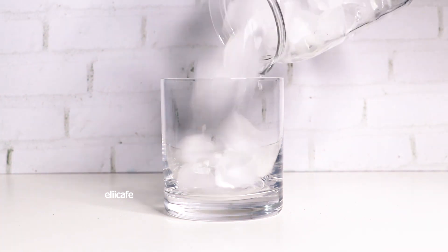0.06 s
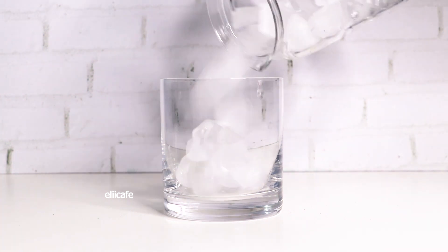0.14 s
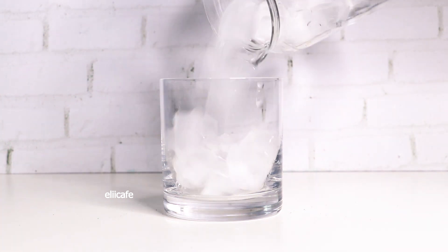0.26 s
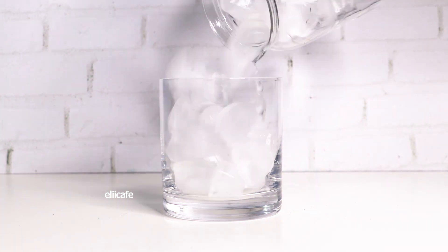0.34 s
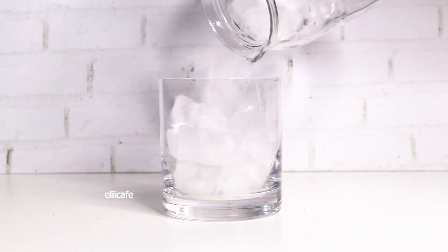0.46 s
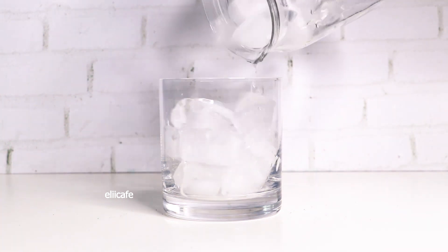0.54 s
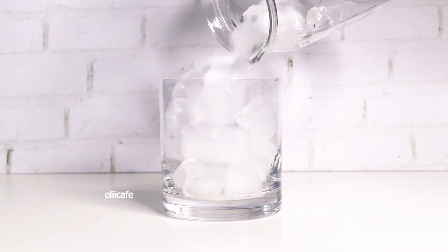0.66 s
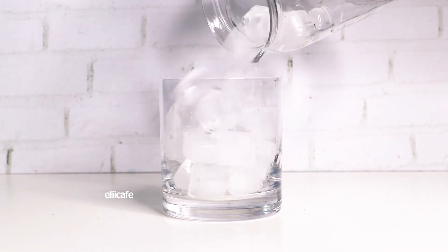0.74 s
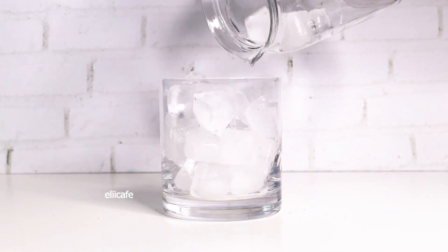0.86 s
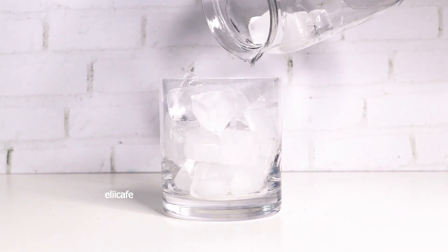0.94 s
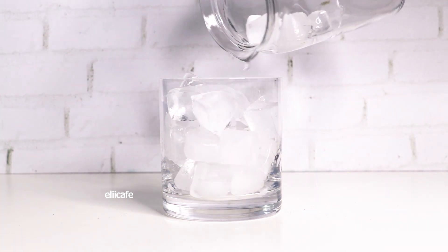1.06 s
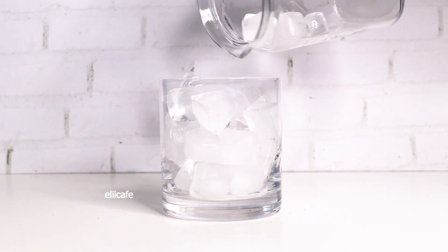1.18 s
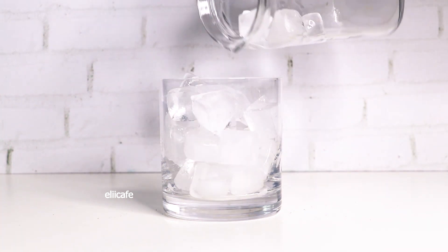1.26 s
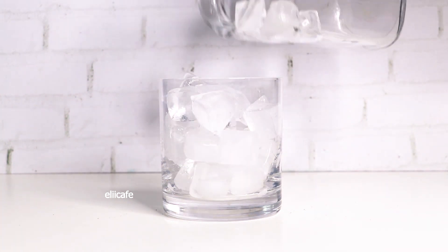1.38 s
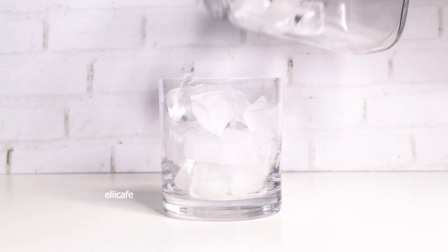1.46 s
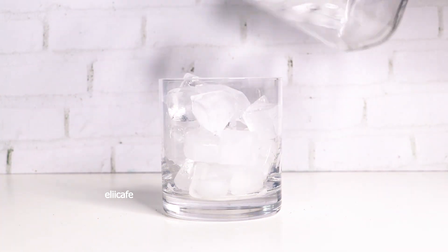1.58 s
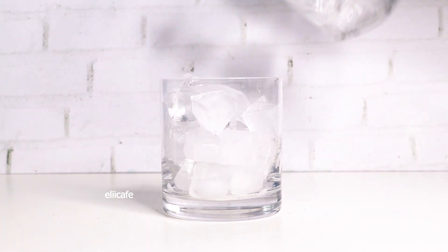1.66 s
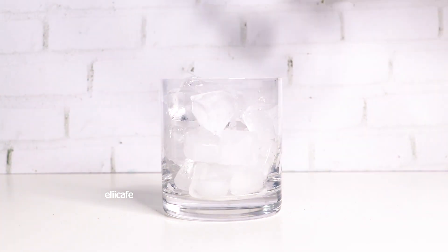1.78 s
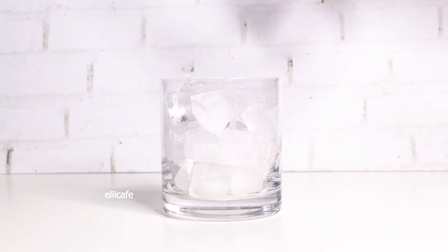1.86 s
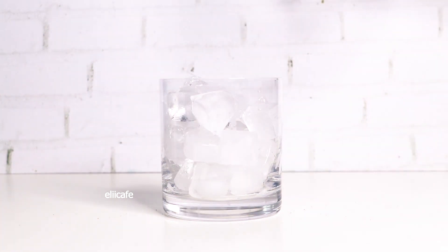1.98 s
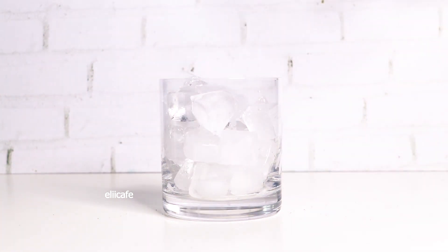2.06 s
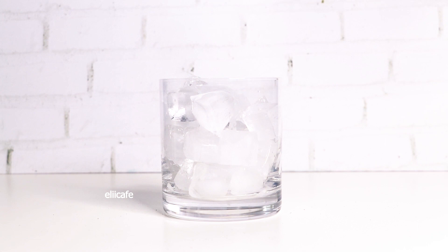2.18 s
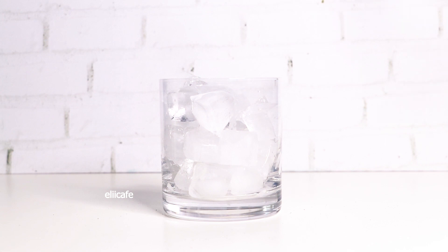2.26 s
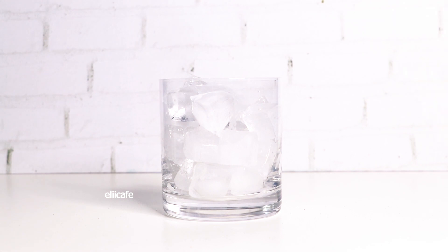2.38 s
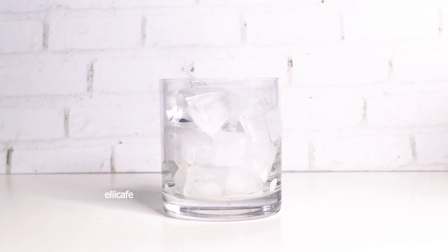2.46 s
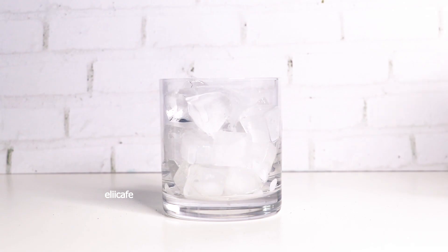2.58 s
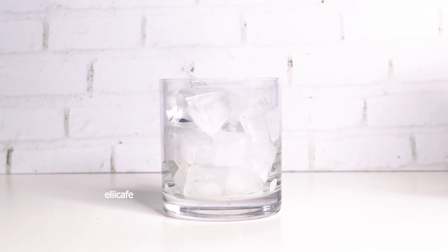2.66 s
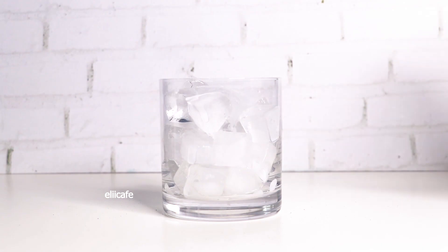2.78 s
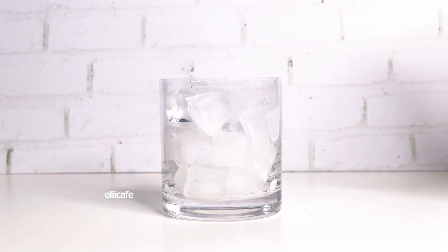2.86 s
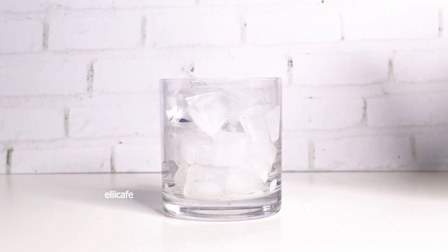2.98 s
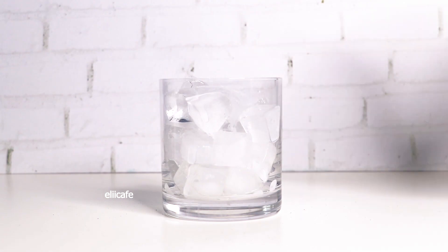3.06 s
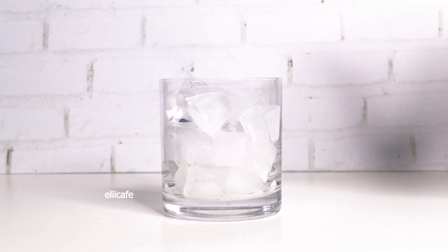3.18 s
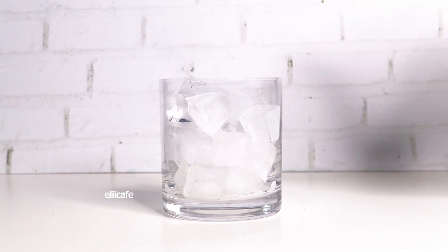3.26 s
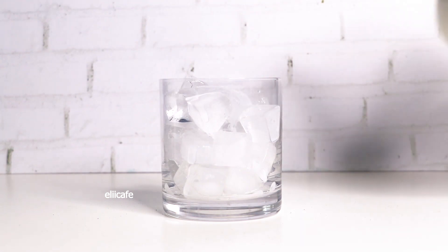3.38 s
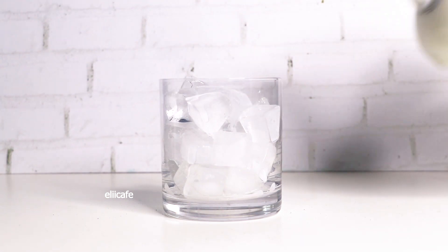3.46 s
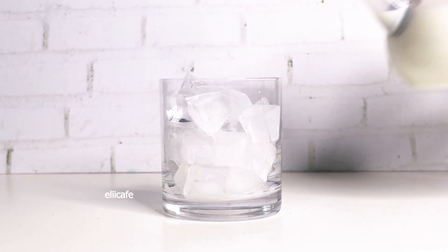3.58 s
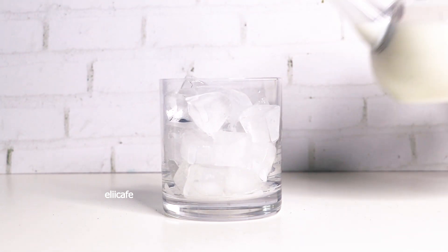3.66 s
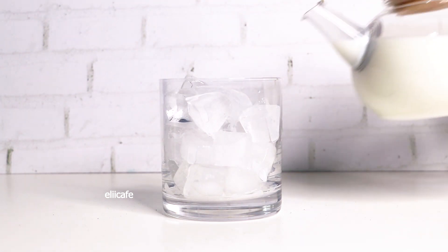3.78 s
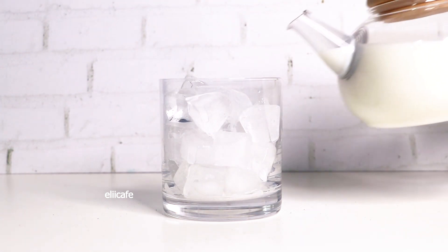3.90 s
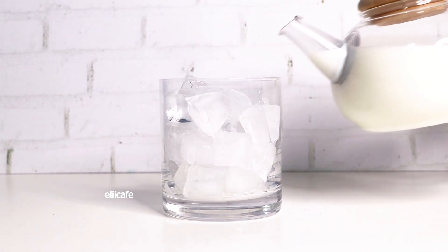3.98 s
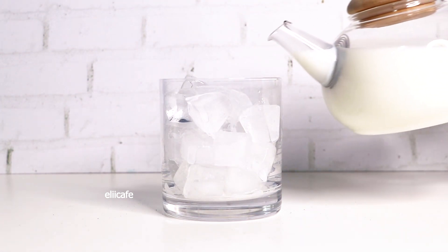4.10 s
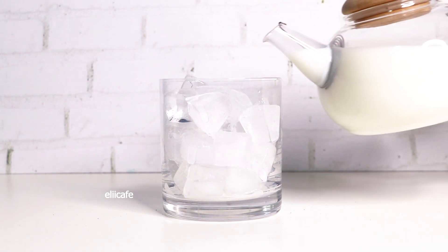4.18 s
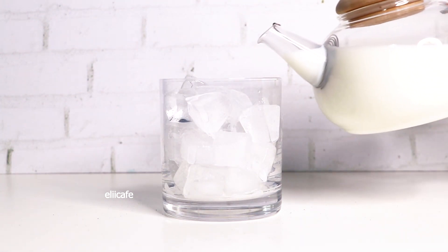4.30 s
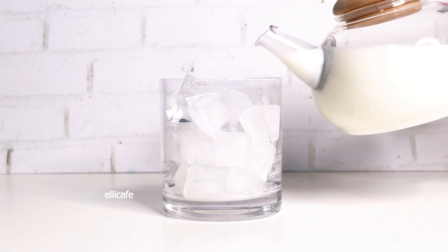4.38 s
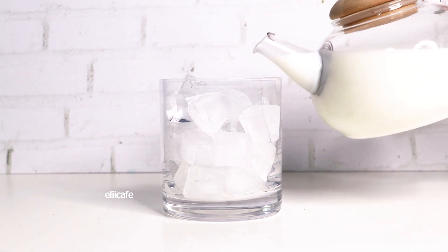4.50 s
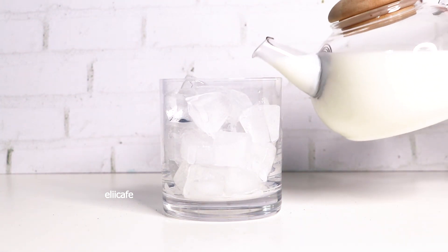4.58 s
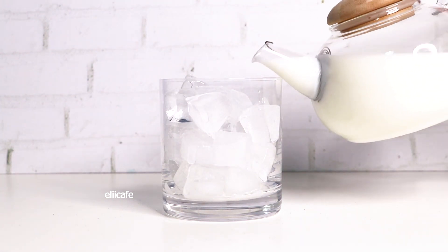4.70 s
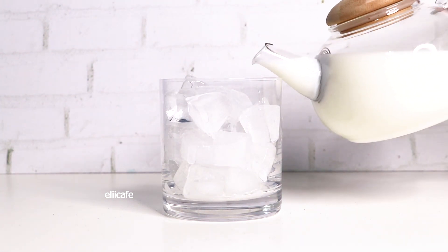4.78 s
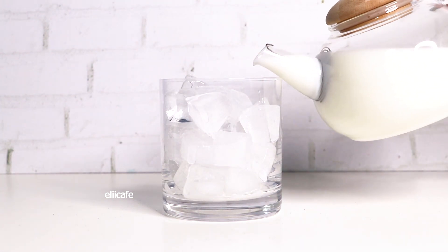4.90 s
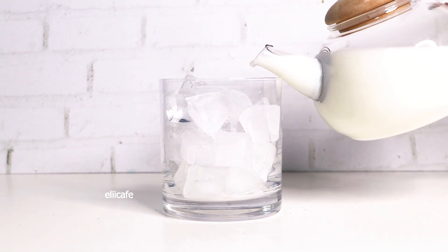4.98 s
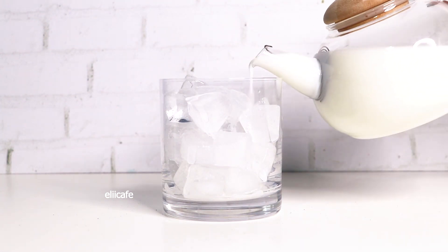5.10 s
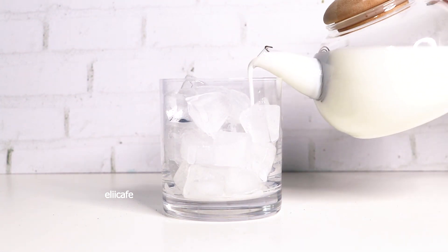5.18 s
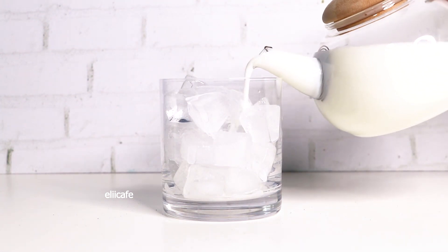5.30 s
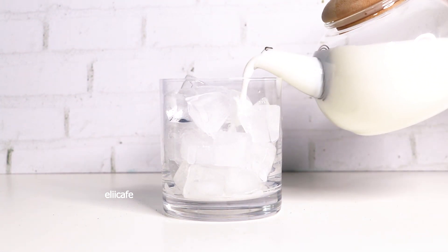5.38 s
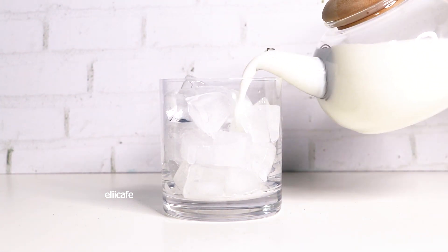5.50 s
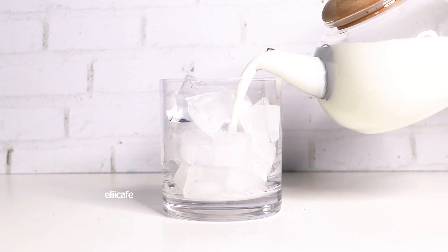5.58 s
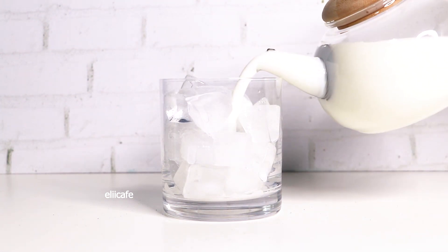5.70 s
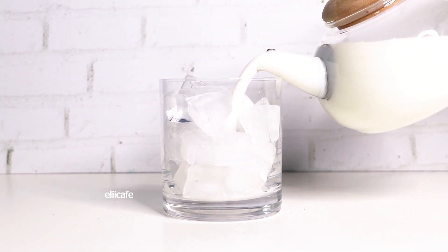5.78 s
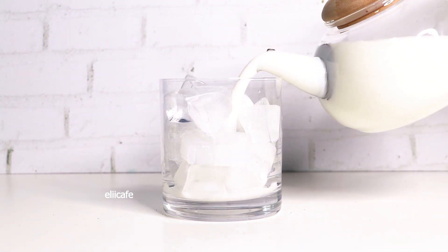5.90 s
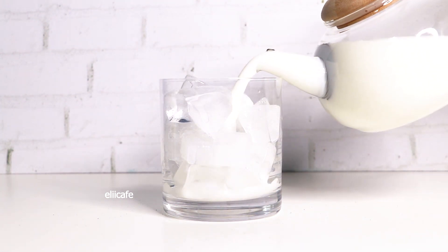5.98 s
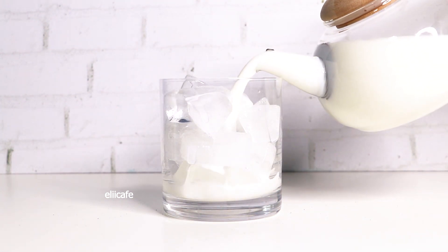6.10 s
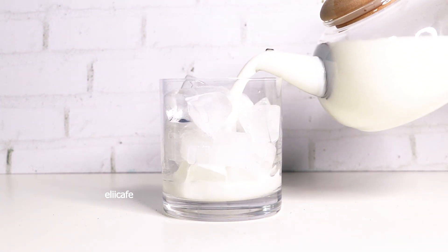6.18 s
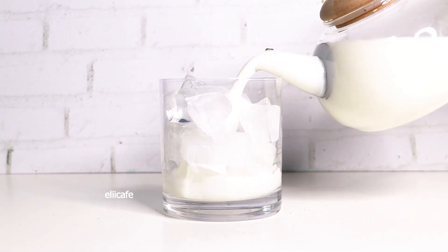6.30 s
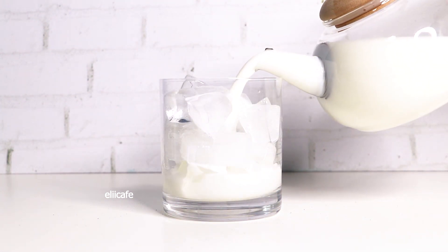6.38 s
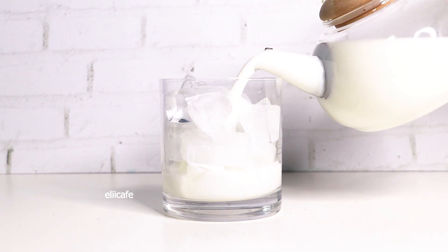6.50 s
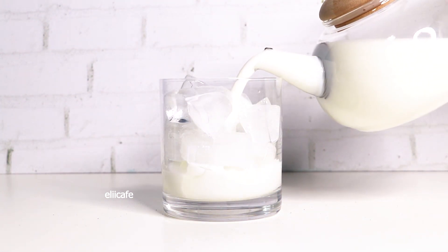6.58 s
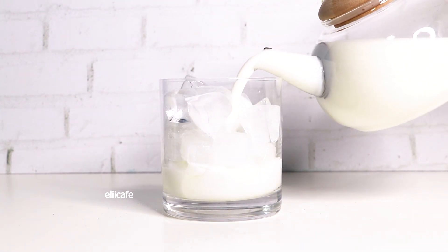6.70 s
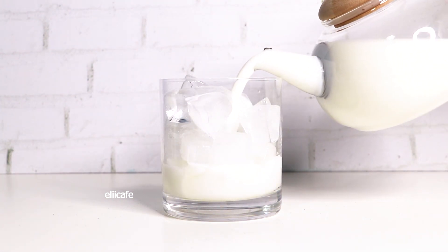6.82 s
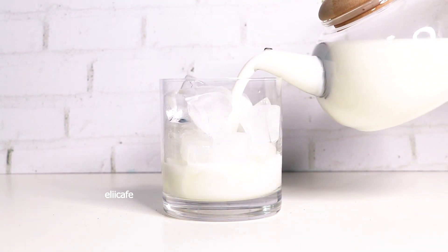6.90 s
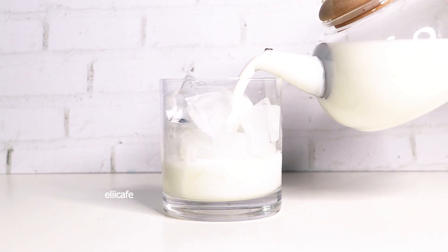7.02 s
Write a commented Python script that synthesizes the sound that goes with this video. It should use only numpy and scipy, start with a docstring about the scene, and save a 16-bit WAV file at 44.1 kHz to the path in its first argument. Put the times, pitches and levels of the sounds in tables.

```python
"""Ice cubes slide from a glass pitcher into a tumbler on a hard table: each impact clacks and excites
the modes of glass and table top. Next, cubes fall back inside the pitcher and set it ringing.
Lone cubes shift, a soft rustle passes, and three dull knocks come through the table. Last, milk
poured on the ice makes a bubble resonate and shifts the cubes. All of it sounds over faint hiss and
rumble in a small hard room, through one microphone with slow gain control."""
import sys
import numpy as np
from scipy import signal
from scipy.io import wavfile
from scipy.ndimage import uniform_filter1d

SR = 44100
rng = np.random.default_rng(int(sys.argv[2]) if len(sys.argv) > 2 else 0)


def persist_wave(psi):
    """Save psi, clipped to +-1, as 16-bit WAV."""
    counts = np.round(np.clip(psi, -1, 1) * 32767).astype(np.int16)
    wavfile.write(sys.argv[1], SR, np.atleast_2d(counts).T)


N = 310905

# rattle of ice sliding into the tumbler: t/s, level/dB
SLIDE_RATTLE = [(0.0, -19), (0.1, -19.5), (0.388, -17.5), (0.756, -18.5), (0.848, -13), (0.988, -25.5),
                (1.1, -58)]
# natural frequencies of the tumbler: f/Hz
TUMBLER_MODES_HZ = [2070, 2233, 2311, 2540, 3025, 3340, 4155, 5735, 6200, 7060, 7690, 8600, 8930, 9440,
                    9960, 11350, 11630, 12480, 13820, 14350, 15300]


def amp(db):
    """Decibels to amplitude ratio."""
    return 10 ** (np.asarray(db) / 20)


def spectrum_at(points, hz):
    """Interpolation on a logarithmic frequency axis."""
    f, value = np.transpose(points)
    return np.interp(np.log(hz + 1), np.log(f + 1), value)


def envelope(rows):
    """Amplitude envelope interpolated in decibels, silent outside its span."""
    s, db = np.transpose(rows)
    return amp(np.interp(np.arange(N) / SR, s, db, -200, -200))


def colour(x, points):
    """Minimum-phase filter with the given magnitude spectrum."""
    log_gain = np.log(amp(spectrum_at(points, abs(np.fft.fftfreq(4096, 1 / SR)))))
    response = np.fft.ifft(np.exp(np.conj(signal.hilbert(log_gain)))).real[:2048]
    return signal.oaconvolve(x, response)[:len(x)]


def filtered(x, kind, hz, order=2):
    """Causal filter with a maximally flat passband."""
    return signal.sosfilt(signal.butter(order, hz, kind, fs=SR, output="sos"), x)


def resonator(hz, t60):
    """Filter coefficients of a damped oscillator with an impulse response of unit height."""
    r, w = 10 ** (-3 / (t60 * SR)), 2 * np.pi * hz / SR
    return [0, np.sin(w)], [1, -2 * r * np.cos(w), r * r]


def ring(x, hz, t60):
    """Forced response of one mode."""
    return signal.lfilter(*resonator(hz, t60), x)


def add(mix, s, sound):
    """Superposition: a sound joins the mix at time s."""
    part = mix[..., round(s * SR):][..., :sound.shape[-1]]
    part += sound[..., :part.shape[-1]]


def air():
    """Noise floor: steady hiss and rumble, and a low stir that comes and goes."""
    # noise spectrum: f/Hz, relative level/dB
    spectrum = [(15, -41.5), (25, 3.5), (127, -0.5), (287, -8.5), (320, -9), (420, -11), (494, -11.5),
                (631, -15), (2580, -17), (11800, -20.5), (15100, -22.5), (16400, -29.5)]
    # swell of the stir: t/s, level/dB
    swell = [(2.1, -57), (2.29, -55.5), (4.75, -61), (4.87, -61), (5.08, -56.5), (5.37, -57), (5.95, -58.5),
             (6.22, -55.5), (7.05, -59.5)]
    steady = colour(rng.standard_normal(N), spectrum)
    stir = filtered(colour(rng.standard_normal(N), spectrum), "band", [90, 1300])
    return amp(-55.5) * steady / steady.std() + envelope(swell) * stir / stir.std()


def rustle():
    """Random amplitude modulation makes a soft patch of midrange noise flicker."""
    # rise and fall of the rustle: t/s, level/dB
    swell = [(2.65, -78), (2.8, -62), (3.2, -66.5), (3.45, -88.5)]
    band = filtered(rng.standard_normal(N), "band", [950, 1630])
    flicker = uniform_filter1d(rng.standard_normal(N), size=1500)
    return envelope(swell) * amp(2.3 * flicker / flicker.std()) * band / band.std()


def room(x):
    """Reverberation: sparse reflections of random sign decay exponentially, each band at its own rate."""
    # reverberation time: f/Hz, t60/s
    decay = [(200, 0.53), (1000, 0.41), (4000, 0.29), (12000, 0.23)]
    taps = np.zeros(SR // 2)
    at = np.arange(250, SR // 2 - 20, 20)
    taps[at + rng.integers(0, 20, len(at))] = rng.choice([-1., 1.], len(at))
    hz, t, bands = signal.stft(taps, SR, nperseg=256)
    tail = signal.istft(bands * amp(-60 * t / spectrum_at(decay, hz)[:, None]), SR, nperseg=256)[1]
    return signal.oaconvolve(x, tail / np.linalg.norm(tail))[:N]


def table_top(push):
    """Plate vibration: blunt forces excite a short broad thump and the low modes of the top."""
    # modes of the top: f/Hz, level/dB, t60/s
    modes = [(171, -11.5, 0.23), (197.7, -10, 0.15), (271, -7, 0.097), (311, -14.5, 0.075),
             (375.7, -4, 0.11), (430, -7, 0.077), (562, -7, 0.048), (655, -6.5, 0.057), (764, -10.5, 0.11),
             (890.7, -4, 0.025), (1120, -14, 0.11)]
    blunt = filtered(push, "low", 1500)
    thump = 1.4 * ring(blunt, 430, 0.015) + .4 * ring(blunt, 920, 0.016)
    return sum(amp(db) * ring(blunt, hz, t60) for hz, db, t60 in modes) + thump


def table_frame(push):
    """Structural resonance: changes in the smoothed force shake the frame in one deep mode."""
    jolt = 110 * np.diff(uniform_filter1d(push, size=200), prepend=0)
    return amp(-23.5) * ring(jolt, hz=62, t60=0.42)


def bubbles():
    """Bubble resonance: air trapped in milk pulsates, rising in pitch as it nears the surface."""
    # damped pulsations: t/s, level/dB, first f/Hz, last f/Hz, t60/s
    pulsations = [(5.62, -24, 984, 1094, 0.086), (5.624, -35, 1183, 1944, 0.062)]
    sound, t = np.zeros(N), np.arange(6000) / SR
    for s, db, first_hz, last_hz, t60 in pulsations:
        hz = first_hz + (last_hz - first_hz) * np.minimum(t / 0.0153, 1)
        add(sound, s, amp(db - 60 * t / t60) * np.sin(2 * np.pi * np.cumsum(hz) / SR))
    return sound


def chatter(decay_s):
    """Inelastic impact: a first contact, then tiny rebounds that die away; unit energy."""
    t, luck = np.arange(1500) / SR, rng.random((2, 1500))
    burst = (luck[0] < .12) * (2 * luck[1] - 1) * np.exp(-t / decay_s)
    burst[0] = 0.9
    return burst / np.linalg.norm(burst)


def shifting_cubes():
    """Heavily damped modes make lone cubes snap and clack; returns sound and force on the table."""
    # shifts: t/s, clack level/dB, clack f/Hz, thud level/dB, snap level/dB
    shifts = [(2.27, -35.5, 3080, -51.5, -49.5), (3.032, -40, 3490, -62.5, -38.5),
              (3.075, -47, 1620, -48.5, -56), (3.756, -43, 2400, -67, -45), (5.677, -31, 3150, -64, -49),
              (6.124, -35.5, 2370, -49.5, -44), (6.249, -41, 3520, -56, -45), (6.286, -11, 2410, -32, -58),
              (6.323, -11, 1370, -33, -22.5), (6.731, -51, 1660, -51.5, -58)]
    sound, push = np.zeros((2, N))
    for s, clack_db, ice_hz, thud_db, snap_db in shifts:
        hit = chatter(0.0028)
        snap = ring(hit, 3360, 0.0045) + .5 * ring(hit, 5030, 0.001)
        clack = ring(hit, ice_hz, .004) + 0.35 * ring(hit, 1.14 * ice_hz, .004)
        add(sound, s, amp(snap_db) * snap + amp(clack_db) * clack)
        push[round(s * SR)] += amp(thud_db + 1)
    return np.array([sound, push])


def knocks():
    """A padded blow has a long contact time, so it is dull; returns its tick and force on the table."""
    # blows: t/s, thud level/dB, tick level/dB
    blows = [(4.851, -12, -11), (5.026, -18.5, -22), (5.217, -17, -18.5)]
    sound, push = np.zeros((2, N))
    pulse = np.hanning(round(0.0019 * SR))
    for s, thud_db, tick_db in blows:
        hit = chatter(0.0068)
        tick = (hit + 0.18 * ring(hit, 2930, 0.012) + 0.31 * ring(hit, 3970, 0.0062)
                + 0.11 * ring(hit, 6300, 0.0044) + 0.03 * ring(hit, 9000, 0.027))
        add(sound, s, amp(tick_db) * tick)
        add(push, s, -amp(thud_db) * pulse / pulse.sum())
    return np.array([sound, push])


def glass_wall(drives, modes_hz, modes, full_s=0, t60_share=1):
    """Modal vibration with contact damping: from full_s on, packed ice scales each t60 by t60_share."""
    # loose cubes lean on the glass, so each mode flutters, the high ones most
    flutters = uniform_filter1d(rng.standard_normal((len(modes), drives.shape[1] // 64 + 1)), 6, axis=1)
    flutters = uniform_filter1d(np.repeat(flutters, 64, axis=1)[:, :drives.shape[1]], 64, axis=1)
    sound, full = 0, round(full_s * SR)
    for drive, flutter, hz, (db, t60) in zip(drives, flutters, modes_hz, modes):
        free, state = signal.lfilter(*resonator(hz, t60), drive[:full], zi=np.zeros(2))
        packed, _ = signal.lfilter(*resonator(hz, t60 * t60_share), drive[full:], zi=state)
        depth = 2.6 * (hz / 8000) ** .8
        sound += amp(db) * (1 + depth * flutter) * np.concatenate([free, packed])
    return sound


def crunch(cracks, rattle, low_cut_hz):
    """Modal overlap: countless short modes of ice and glass blur each contact into noise."""
    # contact spectrum of ice on ice: f/Hz, level/dB
    spectrum = [(82, -40.5), (140, -0.5), (433, -1), (1570, -16.5), (2250, 6), (6690, -6.5), (9180, -14),
                (10600, -26), (16000, -20.5)]
    t = np.arange(3000) / SR
    response = amp(-17.5 - 60 * t / 0.025) * rng.standard_normal(len(t))
    response[0] = 1
    bright = filtered(cracks, "band", [3300, 9000], order=1)
    grit = filtered(colour(2 * rattle, spectrum), "high", low_cut_hz)
    return signal.oaconvolve(bright + grit, response)[:len(cracks)]


def ice_on_glass(blows, rattle_curve, modes_hz, modes, rattle_db, crack_db, push_db, mid_db,
                 low_cut_hz, body_hz=0, **damping):
    """Impact excitation: glass rings, ice clacks and cracks; returns sound and force on the table."""
    n, hz = round(2.6 * SR), np.array(modes_hz)
    drives = np.zeros((len(hz), n))
    clacks, cracks, push = np.zeros((3, n))
    for s, clack_db, thud_db, ring_db, favoured_hz, ice_hz, chatter_s in blows:
        hit = chatter(chatter_s)
        favour = np.exp(-(np.log(hz / favoured_hz) / 0.017) ** 2)  # the spot struck selects high modes
        lower_db = np.where(hz < body_hz, thud_db - 3, clack_db + mid_db)
        mode_db = np.where(hz > 4500, ring_db - 11.5 + 15 * favour, lower_db)
        add(drives, s, amp(mode_db + 2.5 * rng.standard_normal(len(hz)))[:, None])
        clack = ring(hit, ice_hz, 0.0088) + 0.077 * ring(hit, ice_hz * rng.uniform(0.8, 1.9), 0.018)
        add(clacks, s, amp(clack_db + 2.5) * clack)
        add(cracks, s, (amp(ring_db + crack_db) + amp(clack_db - 4)) * hit)
        push[round(s * SR)] += amp(thud_db + push_db)
    strength = amp(5.63 * np.minimum(rng.exponential(1, n), 4))
    contacts = rng.random(n) < 550 / SR  # about 550 a second
    rattle = strength * contacts * rng.choice([-1, 1], n) * envelope(rattle_curve)[:n]
    drives += amp(rattle_db) * rattle * (rng.random(drives.shape) < .3)  # each excites a few modes
    sound = glass_wall(drives, hz, modes, **damping) + clacks + crunch(cracks, rattle, low_cut_hz)
    push += amp(push_db - 14.5) * rattle
    return np.pad([sound, push], ((0, 0), (0, N - n)))


def pitcher():
    """Cubes fall back and excite the pitcher's modes; its sound is thin in the bass."""
    # impacts: t/s, clack, thud and ring level/dB, favoured f/Hz, clack f/Hz, chatter decay/s
    landings = [(1.54, -28, -57.5, -48, 7050, 2840, .004), (1.548, -41, -60.5, -59, 7476, 3500, .003),
                (1.5708, -14.5, -53, -44, 7060, 2800, 0.0027),
                (1.6034, -2.5, -64, -22.5, 7550, 3540, 0.0026), (1.6662, -8.5, -52, -20, 7140, 2820, 0.011),
                (1.727, -9, -26, -1, 6290, 1600, 0.0016), (1.7524, -10, -48, -27, 6620, 3845, .0095),
                (1.7654, -9, -48.5, -10.5, 5800, 2700, .006), (1.8277, -6, -16.5, -10, 11650, 1690, .0036),
                (1.8357, -7, -25, -18, 6370, 2810, 0.0021), (1.861, -12, -60, -8, 11730, 2775, 0.0018),
                (1.8714, -8.5, -58, -14, 6180, 2840, 0.0069), (1.948, -33, -49.5, -6, 9100, 2712, .004),
                (1.953, -3, -64, -14, 7560, 3930, .008), (1.9685, -8, -33.5, -16, 6090, 2840, 0.0039),
                (2.0181, -30, -39, -34, 6900, 2700, 0.0045)]
    # rattle of tumbling ice: t/s, level/dB
    rattle = [(1.56, -84), (1.608, -44), (1.716, -33), (1.748, -55), (1.846, -74), (1.885, -19.5),
              (2.066, -51.5), (2.53, -54.5)]
    # natural frequencies: f/Hz
    modes_hz = [493, 1570, 2410, 2530, 2662, 2835, 3495, 4320, 4705, 5120, 6185, 6315, 6815, 7050, 7557,
                8960, 9720, 10890, 11350, 11740, 12830, 13190, 13700, 15630]
    # the same modes: level/dB, t60/s
    modes = [(2, 0.27), (0.5, 0.2), (-29, .2), (-8.5, 0.34), (3, 0.3), (-2.5, 0.2), (9, 0.071), (-13, .1),
             (-8, 0.25), (-17.5, 0.08), (-2.5, 0.1), (-18.5, 0.014), (-27.5, 0.56), (-8.5, 0.0857),
             (-8, 0.18), (-16, 0.14), (-17.5, 0.21), (-11, .08), (-15.5, 0.076), (-14, 0.052),
             (-16.5, 0.0917), (-44, 0.102), (-11, 0.17), (-15.5, .06)]
    fall = ice_on_glass(landings, rattle, modes_hz, modes, rattle_db=-33.5, crack_db=17, push_db=-52.5,
                        mid_db=-19.5, low_cut_hz=1580, body_hz=1800, full_s=1, t60_share=1)
    return filtered(fall, "high", 260)


def light_landings(count=22, first_s=0.045, last_s=1.01, chatter_s=0.021):
    """Random excitation: softer impacts follow the rattle's level, each favouring one high mode."""
    timing, pitch, spot = rng.random((count, 3)).T
    s = first_s + (last_s - first_s) * (np.arange(count) + timing) / count
    rattle_db = np.interp(s, *np.transpose(SLIDE_RATTLE))[:, None]
    levels_db = rattle_db + (9, -6, -7.5) - 0.5 * rng.standard_normal((count, 3))  # clack, thud, ring
    high_hz = np.array([hz for hz in TUMBLER_MODES_HZ if hz > 4500])
    favoured_hz = high_hz[(spot * len(high_hz)).astype(int)]
    ice_hz = 2060 * (3000 / 2060) ** pitch
    return np.column_stack([s, levels_db, favoured_hz, ice_hz, np.full(count, chatter_s)]).tolist()


def tumbler():
    """Poured cubes excite the tumbler's modes, then damp them once it is packed with ice."""
    # hard impacts: t/s, clack, thud and ring level/dB, favoured f/Hz, clack f/Hz, chatter decay/s
    landings = [(0.0162, -12, -29.5, -27, 5817, 2273, .002), (0.0361, -6, -25.5, -33, 5746, 2866, .006),
                (0.0897, 5, -15.5, -51, 8260, 2913, .006), (0.1225, 1.5, -5.5, -28.5, 11120, 1308, .003),
                (0.1825, -2.5, -36, -21, 9330, 3730, .003), (0.1915, -1.5, -17, -16, 5530, 2250, .017),
                (0.2264, -9, -25, -3.5, 8815, 3800, .004), (0.3071, -3.5, -29, -13.5, 5760, 2400, .008),
                (0.3734, 2, -25, -11.5, 11200, 2402, .01), (0.4194, -7, -22, -5.5, 10130, 2323, .008),
                (0.4858, -2.5, -9, -11.5, 13250, 2470, .012), (0.5354, 3, -13, -14, 13940, 2555, .017),
                (0.5763, 0, -26.5, -10, 11160, 2930, .003), (0.6152, -24, -33.5, -17.5, 7670, 2230, .006),
                (0.6694, -12, -20.5, -8.5, 6240, 2470, .005), (0.7295, 2.5, -3.5, -12.5, 5684, 1810, .003),
                (0.8057, -3, -33.5, -25.5, 7030, 3300, .0045), (0.851, 1, -35.5, -11.5, 9950, 4012, .004),
                (0.8814, -5, -8, -38, 7514, 2110, .004), (1.0676, -8.5, -32, -40.5, 6140, 3024, .0067)]
    # modes, in the order of TUMBLER_MODES_HZ: level/dB, t60/s
    modes = [(-12, .1), (-2, 0.4), (-6, 0.11), (-2, 0.38), (-2, 0.3), (-5, 0.14), (-7.5, 0.3), (-14, 0.47),
             (-25, .08), (-18.5, 0.043), (-13, 0.31), (-15.5, 0.15), (-10, 0.46), (-14, 0.338),
             (-8.5, 0.12), (-10, 0.08), (-5.5, 0.052), (-10.5, 0.017), (-9, .06), (-5.5, 0.067),
             (-5, 0.0535)]
    return ice_on_glass(landings + light_landings(), SLIDE_RATTLE, TUMBLER_MODES_HZ, modes,
                        rattle_db=-30.5, crack_db=12.5, push_db=-5, mid_db=-21.5, low_cut_hz=150,
                        full_s=0.88, t60_share=0.35)


def scene():
    """Superposition of direct sound, reverberation and background, alike in both channels."""
    sound, push = tumbler() + pitcher() + knocks() + shifting_cubes()
    # small sources radiate no deep bass
    direct = filtered(sound + bubbles() + table_top(push), "high", 175, order=4)
    t = np.arange(N) / SR
    # the level dips briefly after the hardest clack
    dip = amp(-13.5 * uniform_filter1d(1. * ((t > .096) & (t < .13)), size=80))
    mono = dip * (direct + table_frame(push) + amp(-9) * room(direct)) + air() + rustle()
    return np.array([mono, mono])


def record(dry):
    """Slow compression lowers the gain after loud passages; self-noise, clipping and band limit follow."""
    power = uniform_filter1d((dry ** 2).mean(0), 800)
    excess_db = np.maximum(10 * np.log10(abs(power) + 1e-12) + 35, 0)
    memory = np.exp(-1 / (.35 * SR))
    levelled = dry / amp(0.33 * signal.lfilter([1 - memory], [1, -memory], excess_db))
    hiss = amp(-62) * rng.standard_normal(dry.shape)
    clipped = np.clip(levelled + hiss, -.97, .97)
    low_pass = signal.firwin(401, 15900, window=("kaiser", 9), fs=SR)
    return signal.oaconvolve(clipped, low_pass[None], "same").clip(-1, 1)


dry = scene()
out = record(dry)
persist_wave(out)
```